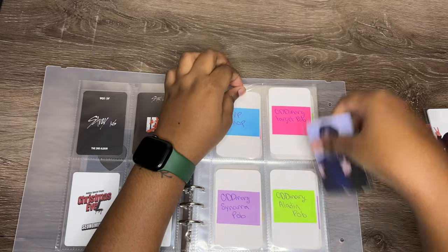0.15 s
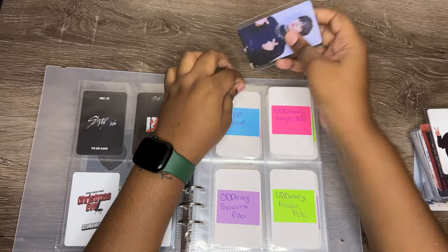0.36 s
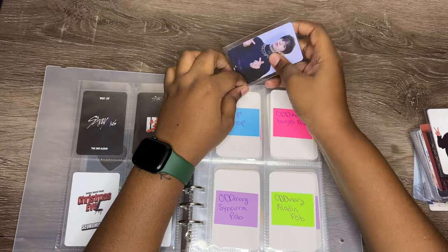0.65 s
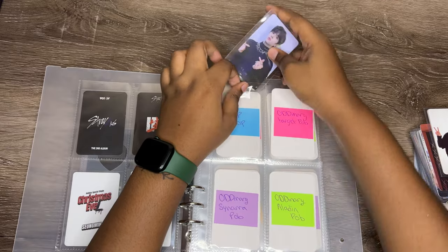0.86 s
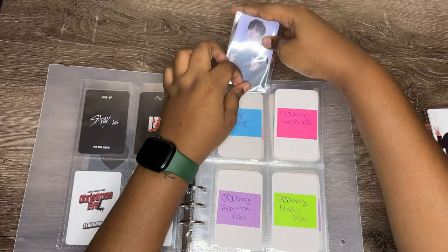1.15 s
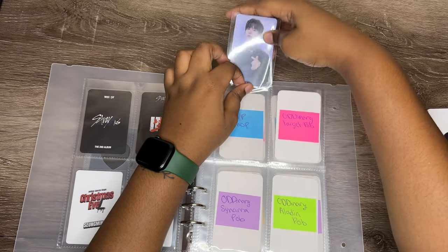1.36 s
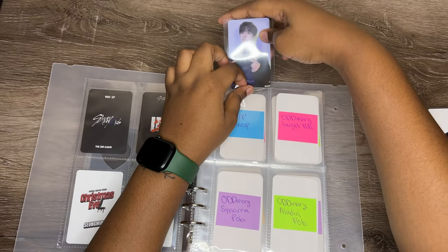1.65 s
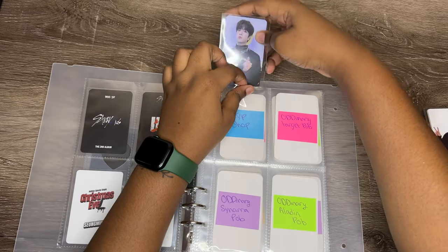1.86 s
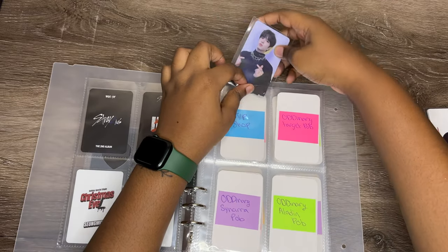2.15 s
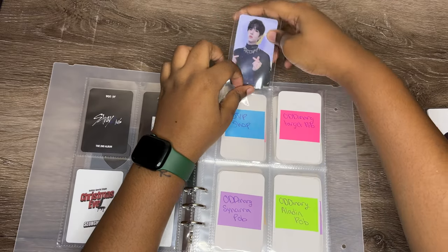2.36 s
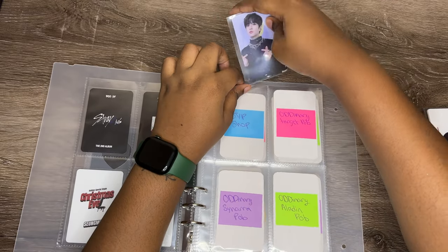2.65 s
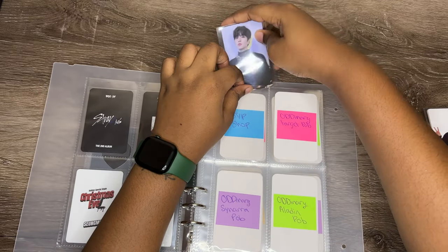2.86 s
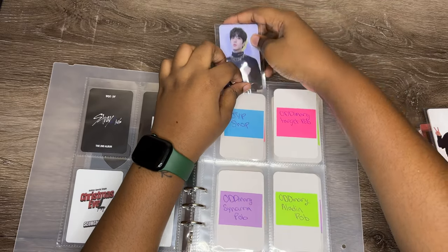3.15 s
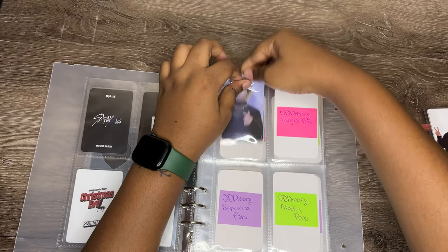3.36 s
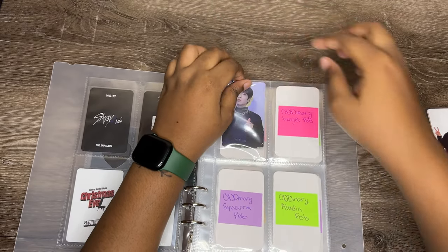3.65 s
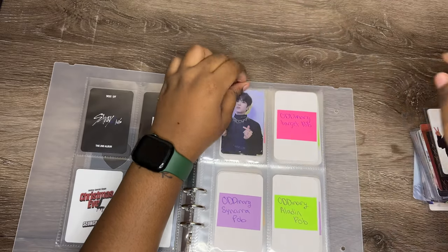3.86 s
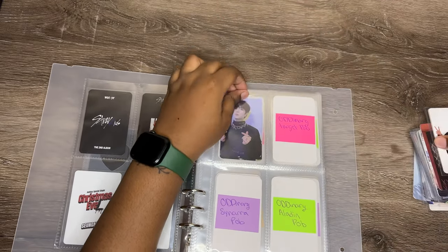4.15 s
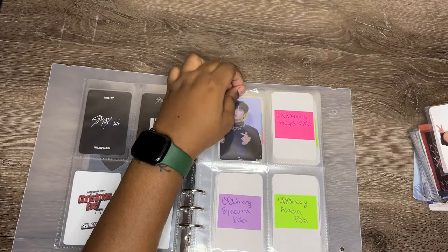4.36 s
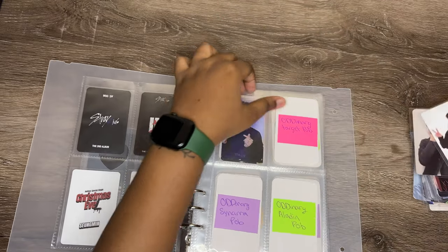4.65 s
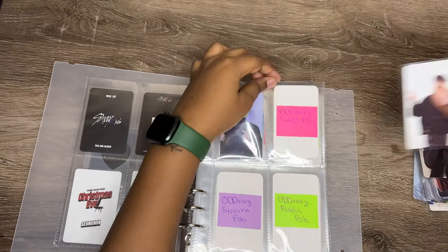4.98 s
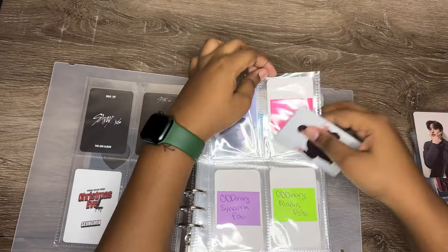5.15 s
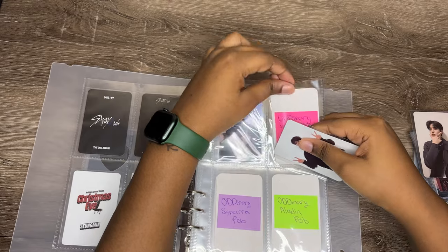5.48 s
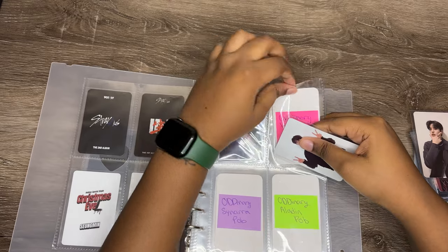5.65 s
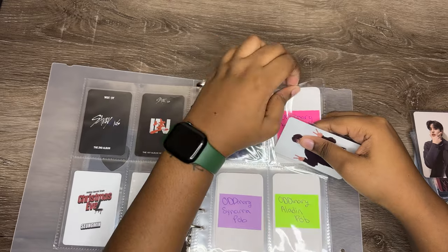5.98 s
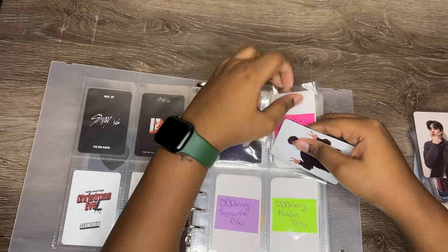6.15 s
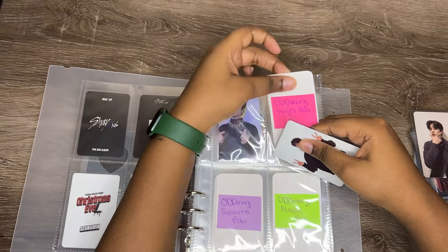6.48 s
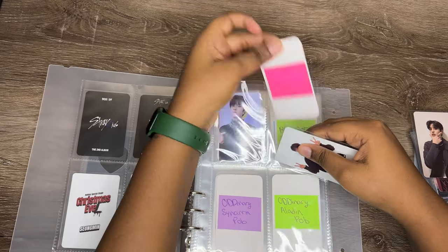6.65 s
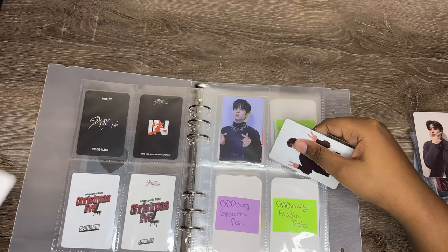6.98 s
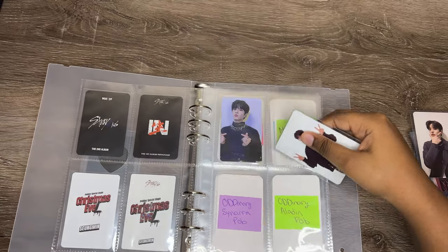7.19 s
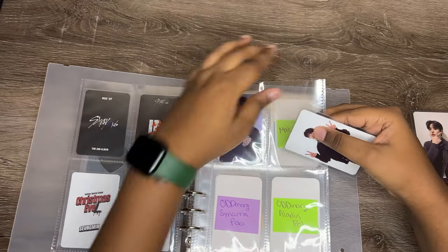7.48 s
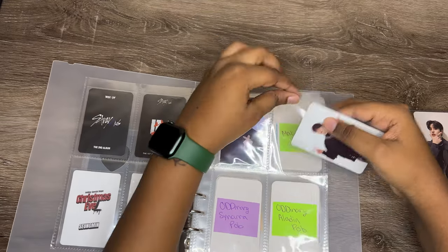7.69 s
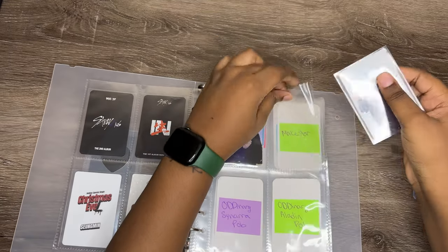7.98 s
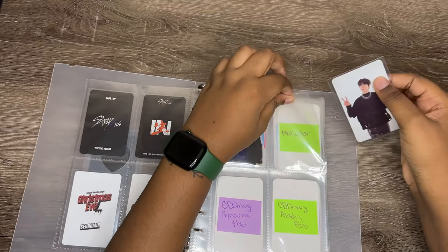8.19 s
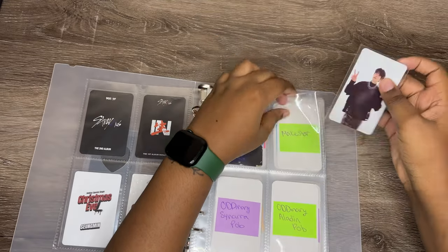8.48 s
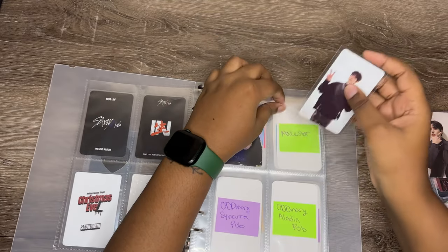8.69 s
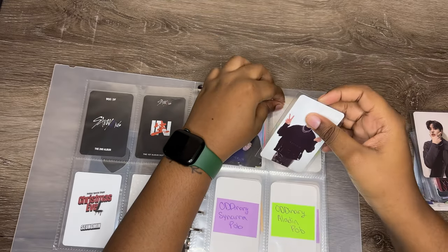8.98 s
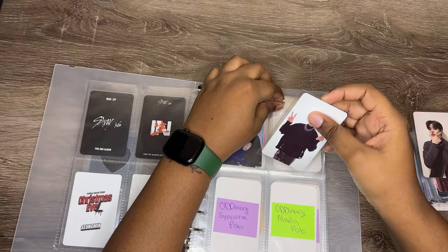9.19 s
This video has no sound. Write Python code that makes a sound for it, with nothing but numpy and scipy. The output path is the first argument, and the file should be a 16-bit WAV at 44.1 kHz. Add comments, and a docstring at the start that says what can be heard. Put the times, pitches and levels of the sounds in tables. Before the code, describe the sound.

Plastic film crinkles, rustles and snaps sharply as hands slide cards into binder pockets on a wooden table in a quiet, small room.

```python
"""Hands slide cards into the plastic pockets of a binder page on a wooden table, in a quiet small room.
From the start a low rumble and faint hiss, made of steady coloured noise, lie under the scene.
Strokes begin at once: film hisses and crackles, made of grainy noise that swells and fades with each stroke.
Within a tenth of a second buckling film starts to snap, with short ringing noise bursts and small chance ticks.
From nearly 3 s on, page or hands land softly: a fading boom plus a push of noise. A phone listens from above."""
import sys
import numpy as np
from scipy import signal
from scipy.fft import rfft, irfft, next_fast_len
from scipy.io import wavfile
from scipy.ndimage import uniform_filter1d, map_coordinates

SR = 44100
rng = np.random.default_rng(int(sys.argv[2]) if len(sys.argv) > 2 else 0)


def unload_wav(signal):
    """Save mono or channel-first audio to the path in sys.argv[1] as 16-bit WAV at rate SR, clipped to [-1, 1]."""
    wavfile.write(
        sys.argv[1],
        SR,
        np.round(np.clip(np.atleast_2d(signal).T, -1, 1) * 32767).astype(np.int16),
    )


N = 411453

# Steady background spectra: (frequency [Hz], relative level per Hz [dB])
RUMBLE_SPECTRUM = [(20, -10), (40, -3), (57, 2.5), (85, -4), (130, -7), (195, -18), (370, -21.5),
                   (560, -33), (700, -46)]
AIR_SPECTRUM = [(450, -6), (880, -4), (1200, -10), (1750, 0), (2400, 0), (2850, -12), (6000, -13),
                (10000, -17), (12000, -28), (15800, -27)]
# Left-right likeness of background, film and reflections: (frequency [Hz], likeness [0-1])
ROOM_ALIKE = [(60, .997), (130, .97), (290, .8), (640, .3), (1410, .6), (3100, .62), (6800, .25)]
FILM_ALIKE = [(90, .997), (300, .9), (640, .87), (1400, .96), (2500, .86), (5000, .9), (15000, .78)]
ECHO_ALIKE = [(130, .97), (640, .8), (1400, .92), (3100, .72), (7000, .25)]

# A hand pushes, slides or smooths; levels are those before the final mix:
# (start [s], length [s], swell over the stroke [dB], bending [dB], rubbing [dB], film-on-film hiss [dB])
STROKES = [(0, 0.027, -16, -67, -52, -57.5), (0.058, 0.084, -10, -68, -67, -62),
           (0.144, 0.16, 5, -78, -75, -73.5), (0.499, 0.013, 13, -67.5, -66, -64),
           (0.703, 0.15, 2, -76, -73, -71.5), (0.841, 0.12, -14, -65.5, -67.5, -70),
           (0.972, 0.018, 17.5, -65, -68, -58.5), (1.094, 0.18, -1, -75.5, -82.5, -85),
           (1.476, 0.097, -6, -84, -78, -71.5), (1.577, 0.09, 10, -65.5, -58.5, -68),
           (1.738, 0.054, -17, -68, -67.5, -73), (1.904, 0.088, 23, -72.5, -70.5, -87.5),
           (2.007, 0.052, -2.5, -61.5, -59.5, -66.5), (2.246, 0.067, 14, -74.5, -74, -74.5),
           (2.337, 0.11, -6, -73, -72.5, -80), (2.613, 0.17, 4, -70.5, -74, -75),
           (2.736, 0.1, -29, -63.5, -64, -74), (2.849, 0.042, -5, -65.5, -76.5, -74),
           (2.988, 0.022, -20, -60.5, -55.5, -56), (3.151, 0.24, 4, -65, -67.5, -62),
           (3.386, 0.067, -3, -72, -72.5, -76.5), (3.561, 0.026, 0, -86, -70, -78.5),
           (3.692, 0.11, -18, -70, -66, -67.5), (3.817, 0.207, -17, -74.5, -72.5, -76.5),
           (4.076, 0.15, -12.5, -83, -77.5, -81), (4.317, 0.033, 14, -92, -83, -75.5),
           (4.424, 0.048, 22.5, -71.5, -71, -67.5), (4.571, 0.12, 17.5, -73.5, -73, -69.5),
           (4.69, 0.096, -10, -82, -74, -72.5), (4.806, 0.041, 2, -79, -72.5, -66),
           (4.942, 0.076, 5, -58, -57.5, -57), (5.067, 0.093, -15, -61, -68.5, -73),
           (5.151, 0.12, -15, -55.5, -66.5, -61.5), (5.284, 0.17, -2, -69.5, -71, -76),
           (5.413, 0.055, 7, -55.5, -54, -52.5), (5.532, 0.088, 20.5, -70.5, -73.5, -77),
           (5.78, 0.034, -9, -61, -61, -64.5), (5.87, 0.066, -36, -65, -63, -73),
           (5.959, 0.099, 21.5, -73, -72, -68), (6.112, 0.13, -11, -59, -57.5, -57),
           (6.212, 0.11, -5, -66, -68, -76), (6.31, 0.28, -17, -66, -67.5, -66),
           (6.611, 0.1, 9, -56.5, -57, -51.5), (6.815, 0.111, 4, -73, -67, -64),
           (7.06, 0.044, 4.5, -65.5, -63.5, -56), (7.144, 0.081, -1.5, -60.5, -67, -68.5),
           (7.265, 0.099, 10.5, -72.5, -77, -88.5), (7.577, 0.067, -5, -64, -67, -65.5),
           (7.659, 0.18, -2.5, -62, -62.5, -61.5), (7.982, 0.11, 4, -67.5, -63.5, -66),
           (8.118, 0.089, -11, -63.5, -60.5, -62.5), (8.419, 0.13, -16.5, -74, -73, -71.5),
           (8.507, 0.1, 15.5, -94, -72, -67), (8.676, 0.13, 11, -93, -85, -89.5)]
# Fingers resting on the page, before the final mix: (bending [dB], rubbing [dB], hiss [dB])
RESTING_LEVELS = [-92, -86.5, -88.5]
# The contact takes hold (a share of the stroke's length is added), then fades by 60 dB in the release time
ATTACK_S, ATTACK_SHARE, RELEASE_T60_S = 0.0045, 0.1, 0.073
# Spectra of bending, rubbing and film-on-film hiss: (frequency [Hz], relative level per Hz [dB])
BEND_SPECTRUM = [(120, -23), (300, -5), (600, -12), (950, -5.5), (1400, -4), (2200, -25.5), (4000, -45)]
RUB_SPECTRUM = [(700, -33), (1200, -14), (1600, -0.5), (2150, 0), (2700, -5.5), (3500, -1), (4400, -6),
                (7000, -24)]
HISS_SPECTRUM = [(2500, -9.5), (4300, -3.5), (5600, 3), (7000, 3), (8200, 2), (10200, 1.5), (11300, -10.5),
                 (12500, -19), (14000, -11.5), (15800, -13)]
GRIP_DB = 1.6  # size of the random changes in finger pressure

# The film buckles: (time [s], pitch of the flexing patch [Hz], strength of its ring [dB], level [dB],
# brightness [dB per octave], thud against the card [dB])
SNAPS = [(0.0678, 700, 19.5, -20.5, 0.5, -33), (0.0763, 790, 14.5, -12, 1, -13.5),
         (0.2468, 1180, 14.5, -21.5, 3.5, -21), (0.5075, 1530, 20.5, -27, 4, -16.5),
         (0.6068, 1350, 13, -34, 1.5, -44), (0.864, 1610, 10.5, -22.5, 4, -36),
         (0.9023, 1470, 22, -29.5, 3.5, -36), (0.9304, 2090, 1.5, -20, -5, -11),
         (0.9874, 1550, 19, -29.5, 6.5, -31), (1.363, 3780, 1, -36.5, 0, -45),
         (1.4875, 1430, 15, -24, 1, -46), (1.5026, 2500, 12, -17.5, 3, -27),
         (1.6645, 1670, 16, -27, -3, -38), (1.7796, 1570, 14, -25, -2, -36),
         (1.7881, 1550, 6.5, -15, -1.5, -47), (1.8564, 3330, 10.5, -0.5, 2.5, -20.5),
         (1.98, 1230, 16, -23, -3, -45), (2.0154, 2340, 13.5, -25, -3, -36),
         (2.3948, 600, 12, -20.5, 0.5, -16), (2.406, 1387, 13, -23.5, 4.5, -11.5),
         (2.6157, 1430, 14, -21, 3, -18), (2.6638, 600, 5, -18.5, 3.5, -14),
         (2.6917, 3560, 3.5, -9.5, 1, -20), (2.989, 1490, 3.5, -12.5, -1.5, -25.5),
         (3.3762, 820, 15, -25.5, 2, -35), (3.4035, 600, 11.5, -25.5, -4, -17.5),
         (3.4454, 1670, 8, -34, 9, -20), (3.7208, 784, 8, -3.5, -1.0, -2.5),
         (3.9737, 2490, 9, -17, -2.0, -45), (4.1229, 3040, 14, -32.5, -2.5, -29.5),
         (4.4448, 2350, 8, -11.5, 3.5, -18), (4.8853, 1250, 5.5, -21, -1.5, -18),
         (4.9521, 1550, 12.5, -9, 0.5, -14), (4.991, 1660, 4.5, -5.0, -0.5, -14),
         (5.2018, 990, 5.5, -14.5, -8, -16.5), (5.2105, 1340, 14, -10, 1, -34),
         (5.4193, 1560, 17, -23, 5.5, -34), (5.4532, 1590, 9.5, 2, 1.5, -16),
         (5.519, 3500, 7.5, -13, -3, -16.5), (5.6396, 2970, 16, -25.5, 1.5, -36),
         (5.8781, 3630, 8, -12.5, -4.5, -6.5), (5.9863, 1540, 13, -15.0, -3, -16),
         (5.9973, 3860, 9, -18, 4, -32), (6.0904, 1560, 10, -17, 0.5, -19), (6.142, 2800, 18, -16, -5, -40),
         (6.1786, 1190, 6, -13, 0, -7), (6.2657, 3530, 18.5, -25.5, -7.5, -32),
         (6.342, 3500, 21, -22, 2, -22), (6.6556, 1700, 12.5, -19.5, -7.5, -26),
         (6.6926, 890, 16.5, -6.5, 0.5, -5), (6.743, 610, 8, -19.5, 1.5, -13),
         (6.8361, 2140, 6, -31.0, 5, -21), (7.145, 2960, 2, -26.5, 3.5, -19.5),
         (7.1686, 4230, 10, -25.5, -0.5, -13.5), (7.4765, 2020, 14, -31, -9, -30),
         (7.5805, 2180, 11.5, -23, -6.0, -32), (7.628, 1270, 8, -24, -2.5, -14.5),
         (7.6793, 940, 7.5, -3, -1.5, -0.5), (7.7647, 3000, 11, -5.0, -7.5, -1.5),
         (7.7784, 1680, 17, -13, 0.5, -6), (7.8303, 1830, 11.5, -4.5, -4, -3),
         (8.1647, 2090, 15.5, -17.5, -3.5, -24), (8.404, 1570, 12, -28, -2, -46.5),
         (8.4678, 3620, 11, -19.5, -3, -26), (8.9715, 1560, 24, -45, 9, -31.5)]
# Basic colour of a snap: (frequency [Hz], level [dB])
SNAP_COLOUR = [(50, -21), (250, 0), (480, -.5), (850, 0.18), (2200, 0), (3400, -2.4), (5200, -3.5),
               (7200, -2), (10200, -6.5), (11700, -16), (13000, -23), (14300, -18), (15500, -13)]
# How much of each frequency belongs to the thud: (frequency [Hz], share [0-1])
THUD_SHARE = [(480, 1), (850, 0)]
SNAP_RISE_S, RISE_SCATTER = 0.0009, .1  # typical time of the flip, spread of its natural logarithm
FLUTTER_DB, FLUTTER_T60_S = -23, .045  # starting level against the flip, time to fade by 60 dB
# Brightness tilts this range about its pivot
TILT_LOW_HZ, TILT_PIVOT_HZ, TILT_HIGH_HZ = 850, 2200, 14000

# Small creases give way by chance: rate, level in a still hand, growth with rubbing (dB per dB), spread
TICKS_PER_S, TICK_DB, TICK_GROWS, TICK_SCATTER_DB = 24, -53, 0.72, 4.5
TICK_HZ, TICK_OCTAVES, TICK_RING_DB = 1870, 0.38, 8.5  # middle pitch, its spread, strength of the ring
TICK_TILT_DB, TICK_THUD_DB = -1.5, -6  # brightness per octave, thud against the tick's level

# Page and hands land on the table: (time [s], level of the boom before it fades [dB], boom pitch [Hz])
LANDINGS = [(2.822, -45, 253), (3.405, -51, 140), (3.725, -37, 130), (4.7, -48.5, 190.6), (5.881, -41, 255),
            (6.171, -43.5, 302), (7.068, -31, 290), (7.076, -33, 140), (7.099, -29.5, 110),
            (7.228, -48, 123), (7.889, -48, 116), (8.136, -45.5, 317)]
# Spectrum of the push on the table top: (frequency [Hz], relative level [dB])
TABLE_SPECTRUM = [(25, -10), (58, 3), (90, -3), (132, 4), (195, -5), (320, -3), (500, -11), (900, -24),
                  (3000, -55)]

# How long the walls answer: (frequency [Hz], time to fade by 60 dB [s])
WALLS = [(150, 0.95), (1000, 0.29), (4000, 0.21), (9000, .19), (16000, 0.031)]
# Microphone ports: (frequency [Hz], phase by which left leads [radians])
PORTS = [(4700, 0), (5600, -1.05), (7600, -1.3), (15500, -1.55)]
TOP_HZ = 16100  # the phone's upper band limit


def amp(db):
    """Turn decibels into a gain."""
    return 10 ** (np.asarray(db) / 20)


def unit(x):
    """Scale to an rms (average strength) of 1."""
    return x / np.sqrt(np.mean(x ** 2) + 1e-20)


def along(points, hz):
    """Read between (frequency, value) points on a logarithmic frequency axis."""
    point_hz, values = np.transpose(points)
    return np.interp(np.log(hz + 1), np.log(point_hz + 1), values)


def shape(points, hz):
    """Gain of a spectrum that falls away steeply beyond its ends."""
    skirt = np.minimum(1, hz / points[0][0]) * np.minimum(1, points[-1][0] / (hz + 1))
    return amp(along(points, hz)) * skirt ** 4


def wobble(rate):
    """Draw a smooth random curve with rate knots a second."""
    knots = rng.standard_normal(int(N * rate / SR) + 4)
    return map_coordinates(knots, [np.arange(N) * rate / SR], order=2)


def filtered(x, response):
    """Pass x through a filter given as a function of frequency."""
    m = next_fast_len(N + SR // 4)
    return irfft(rfft(x, m) * response(np.fft.rfftfreq(m, 1 / SR)), m)[..., :N]


def causal(gain):
    """Make a filter with this gain that rings only after the blow, never before it."""
    cepstrum = irfft(np.log(np.maximum(gain, 1e-6)))
    half = len(cepstrum) // 2
    # folding the second half onto the first gives the minimum-phase filter
    cepstrum[1:half] *= 2
    cepstrum[half + 1:] = 0
    return np.exp(rfft(cepstrum))


def spread(pair, alike, hz):
    """Mix two unrelated spectra into left and right of a given likeness."""
    turn = np.arccos(np.clip(along(alike, hz), -1, 1)) / 2
    mid = pair[0] * np.cos(turn)
    side = pair[1] * np.sin(turn)
    return np.array([mid + side, mid - side])


def coloured(pair, spectrum, alike):
    """Turn two noises into a stereo sound of rms 1 with this spectrum."""
    m = next_fast_len(N + SR // 4)
    hz = np.fft.rfftfreq(m, 1 / SR)
    stereo = spread(rfft(pair, m) * shape(spectrum, hz), alike, hz)
    return unit(irfft(stereo, m)[:, :N])


def add(track, s, sound):
    """Mix a sound into the track at time s."""
    part = track[:, max(0, round(s * SR)):][:, :sound.shape[1]]
    part += sound[:, :part.shape[1]]


def burst(envelope, even_hz):
    """Spectra of two noise bursts, evened out to level 1 over stretches of even_hz."""
    spectra = rfft(rng.standard_normal((2, len(envelope))) * envelope)
    width = max(2, int(even_hz * len(envelope) / SR))
    return spectra / np.sqrt(np.abs(uniform_filter1d(np.abs(spectra) ** 2, width)) + 1e-12)


def room_tone():
    """Distant machinery rumbles steadily through the walls, under a faint airy hiss."""
    rumble = amp(-60.3) * coloured(rng.standard_normal((2, N)), RUMBLE_SPECTRUM, ROOM_ALIKE)
    air = amp(-81) * coloured(rng.standard_normal((2, N)), AIR_SPECTRUM, ROOM_ALIKE)
    return rumble + air


def strokes():
    """Gains of bending, rubbing and hiss: each stroke takes hold, swells or fades, and lets go."""
    power, t = np.zeros((3, N)), np.arange(SR // 2) / SR
    for s, length, swell_db, *levels_db in STROKES:
        hold_db = swell_db * (np.minimum(t / length, 1) - .5)
        release_db = -60 * np.maximum(t - length, 0) / RELEASE_T60_S
        attack = np.minimum(t / (ATTACK_S + ATTACK_SHARE * length), 1)
        envelope = attack * amp(hold_db + release_db)
        add(power, s, np.outer(amp(levels_db), envelope) ** 2)
    return np.sqrt(power + amp(RESTING_LEVELS)[:, None] ** 2)


def sparks(rate, scatter_db, life):
    """Power, mean 1, of tiny random slips of uneven size, each dying away over about life seconds."""
    happens = rng.random(N) < rate / SR
    sizes = amp(scatter_db * np.clip(rng.standard_normal(N), -2, 2)) * happens
    power = signal.lfilter([1], [1, -np.exp(-1 / (life * SR))], sizes ** 2)
    return power / power.mean()


def slips(creases, rate, life, smooth, creased):
    """Friction: fine slips, a share of smooth sliding and a share of little creases giving way."""
    fine = sparks(rate, scatter_db=5, life=life)
    power = smooth + creased * creases + (1 - smooth - creased) * fine
    return np.sqrt(power) * rng.standard_normal((2, N))


def patchy(pair, depth_db, size=9, count=5):
    """The contact wanders over the film, so its colour shifts from moment to moment."""
    z = signal.stft(pair, nperseg=512)[2]
    # random gains, smoothed over size frequency bins and count moments
    field = uniform_filter1d(rng.standard_normal(z.shape[1:]), size, 0)
    field = uniform_filter1d(field, count, 1)
    return signal.istft(z * amp(depth_db * unit(field)), nperseg=512)[1][:, :N]


def rustle(bending, rubbing, sliding):
    """Bending gives coarse crackle, rubbing a finer grain, film on film a dense hiss with tiny ticks."""
    grip = amp(GRIP_DB * wobble(35))  # the fingers press unevenly
    # a crease that gives way is heard in all three layers at once
    creases = sparks(rate=45, scatter_db=4.5, life=.0009)
    bend = slips(creases, rate=260, life=.0013, smooth=.2, creased=.25)
    rub = slips(creases, rate=450, life=.001, smooth=.32, creased=.25)
    hiss = slips(creases, rate=700, life=.0007, smooth=.46, creased=.16)
    bend_sound = bending * coloured(patchy(bend, depth_db=4.0), BEND_SPECTRUM, FILM_ALIKE)
    rub_sound = rubbing * coloured(patchy(rub, depth_db=3.0), RUB_SPECTRUM, FILM_ALIKE)
    hiss_sound = sliding * coloured(patchy(hiss, depth_db=2.0), HISS_SPECTRUM, FILM_ALIKE)
    return grip * (bend_sound + rub_sound + hiss_sound)


def snaps(rows, ring_octaves=0.26, uneven_db=1.5, lag=.0013, size=4096):
    """A patch of film flips over in a millisecond or two and rings briefly at its own pitch."""
    out, t, hz = np.zeros((2, N)), np.arange(size) / SR, np.fft.rfftfreq(size, 1 / SR)
    # bending waves are slower at low pitch (lag = travel time [s] at 1 kHz), so each snap chirps downwards
    travel = np.exp(-4j * np.pi * lag * np.sqrt(1000 * hz))
    octaves = np.log2(np.clip(hz, TILT_LOW_HZ, TILT_HIGH_HZ) / TILT_PIVOT_HZ)
    low = along(THUD_SHARE, hz)
    for s, pitch_hz, ring_db, level_db, tilt_db, thud_db in rows:
        u = t / (SNAP_RISE_S * np.exp(RISE_SCATTER * rng.standard_normal()))
        flip = u * np.exp(1 - u)
        # the sheet around the flip flutters on
        flutter = amp(FLUTTER_DB - 60 * t / FLUTTER_T60_S) * (1 - np.exp(-u))
        uneven = [(f, db + uneven_db * rng.standard_normal()) for f, db in SNAP_COLOUR]
        colour = along(uneven, hz) + (1 - low) * (level_db + tilt_db * octaves) + low * thud_db
        ring = ring_db / (1 + (np.log2((hz + 1) / pitch_hz) / ring_octaves) ** 2)
        noise = spread(burst(flip + flutter, even_hz=897), FILM_ALIKE, hz)
        add(out, s - lag / 2, irfft(noise * travel * causal(amp(colour + ring))))
    return out


def ticks(rubbing, count=600):
    """List small chance snaps of creasing film, stronger while the fingers rub harder."""
    times = np.cumsum(rng.exponential(1 / TICKS_PER_S, count))
    effort_db = 20 * np.log10(rubbing / rubbing.min())
    rows = []
    for s, (high, strong) in zip(times[times < N / SR], rng.standard_normal((count, 2))):
        db = TICK_DB + TICK_GROWS * effort_db[int(s * SR)] + TICK_SCATTER_DB * strong
        pitch_hz = TICK_HZ * 2 ** (TICK_OCTAVES * high)
        rows.append((s, pitch_hz, TICK_RING_DB, db, TICK_TILT_DB, db + TICK_THUD_DB))
    return rows


def thumps(rise=0.0051, cycles=8, push_db=-8, size=8192):
    """A soft landing pushes on the table top; page and table boom for a few cycles."""
    out, t, hz = np.zeros((2, N)), np.arange(size) / SR, np.fft.rfftfreq(size, 1 / SR)
    wood = causal(shape(TABLE_SPECTRUM, hz))
    for s, db, boom_hz in LANDINGS:
        noise = burst(t / rise * np.exp(-t / rise), even_hz=201)
        push = irfft(spread(noise, FILM_ALIKE, hz) * wood)
        onset = 1 - np.exp(-t * boom_hz * np.pi)
        fade = amp(-60 * t * boom_hz / cycles)  # down by 60 dB after this many cycles
        boom = np.sin(2 * np.pi * boom_hz * t) * onset * fade
        add(out, s, amp(db) * (boom + amp(push_db) * push / np.abs(push).max()))
    return out


def echoes(gap=.003, early_db=7, early_t60=0.03):
    """Hands and table answer within a few milliseconds; the walls add a short tail."""
    hz, t, z = signal.stft(rng.standard_normal((2, SR // 4)), SR, nperseg=256)
    walls = amp(-60 * t / along(WALLS, hz)[:, None])
    early = amp(early_db - 60 * t / early_t60)
    tail = signal.istft(spread(z, ECHO_ALIKE, hz[:, None]) * (walls + early), SR, nperseg=256)[1]
    return np.pad(tail / np.linalg.norm(tail[0]), ((0, 0), (int(gap * SR), 0)))


def room(x, size=4096):
    """A short, diffuse room tail, drawn afresh for each overlapping piece so no fixed colour builds up."""
    out, mono = np.zeros((2, N)), np.pad(x.mean(0), (0, size))
    # overlapping pieces fade into each other
    for i in range(0, N, size // 2):
        piece = mono[i:i + size] * np.hanning(size)
        add(out, i / SR, signal.fftconvolve(piece[None], echoes(), axes=1))
    return out


def ports(x):
    """Direct treble reaches the two microphone ports out of step."""
    return filtered(x, lambda hz: np.exp(.5j * along(PORTS, hz) * np.array([[1], [-1]])))


def scene():
    """Mix the binder close by with its reflections and the room around it."""
    background = room_tone()
    bending, rubbing, sliding = strokes()
    film = rustle(bending, rubbing, sliding)
    hits = snaps(SNAPS) + snaps(ticks(rubbing)) + thumps()
    direct = ports(hits + amp(-0.5) * film)
    reflected = room(amp(-11.5) * hits + amp(-6) * film)
    return direct + reflected + background


def record(dry):
    """The phone cuts off steeply above its band limit."""
    return filtered(dry, lambda hz: 1 / (1 + (hz / TOP_HZ) ** 120))


dry = scene()
out = record(dry)
unload_wav(out)
```